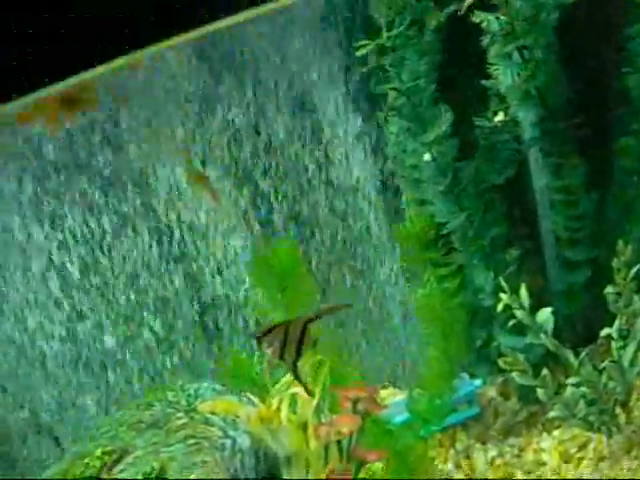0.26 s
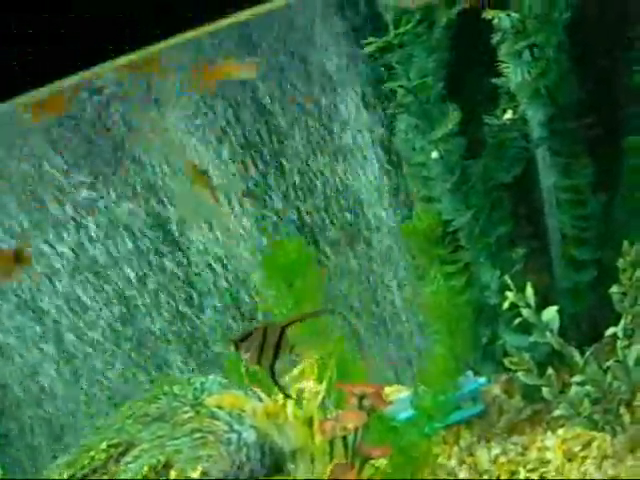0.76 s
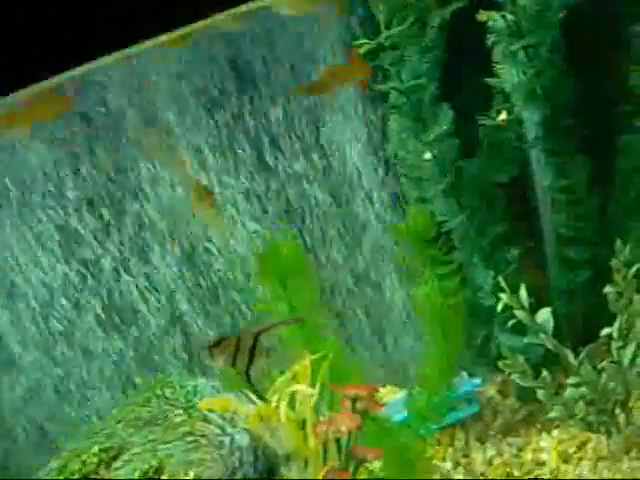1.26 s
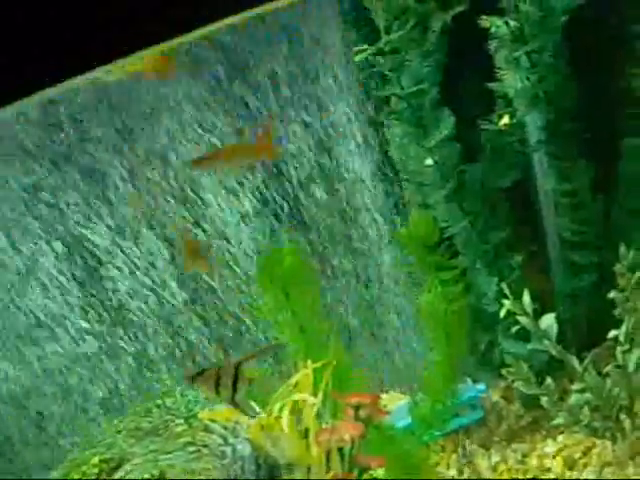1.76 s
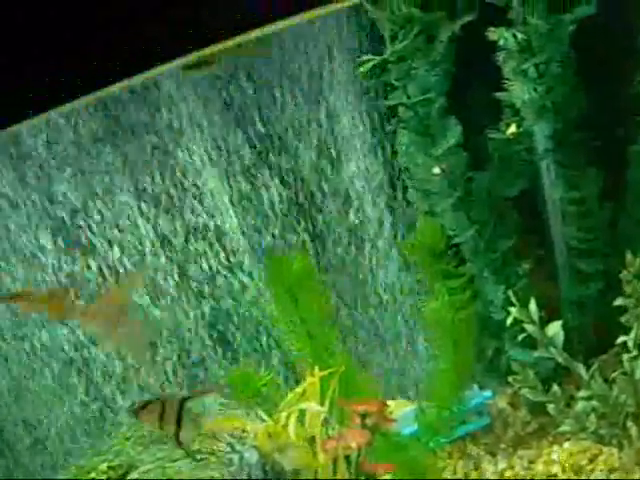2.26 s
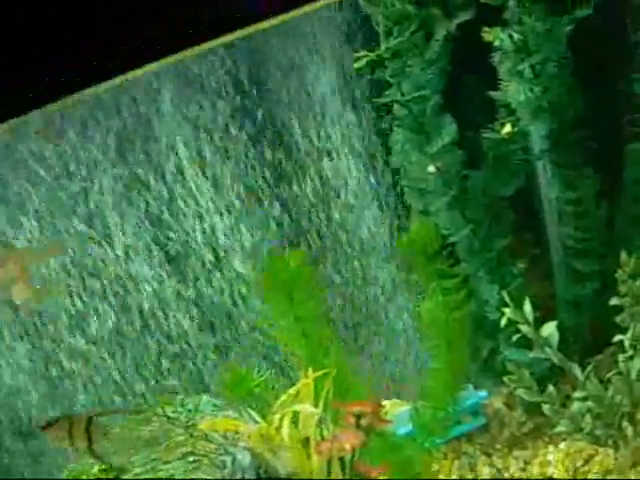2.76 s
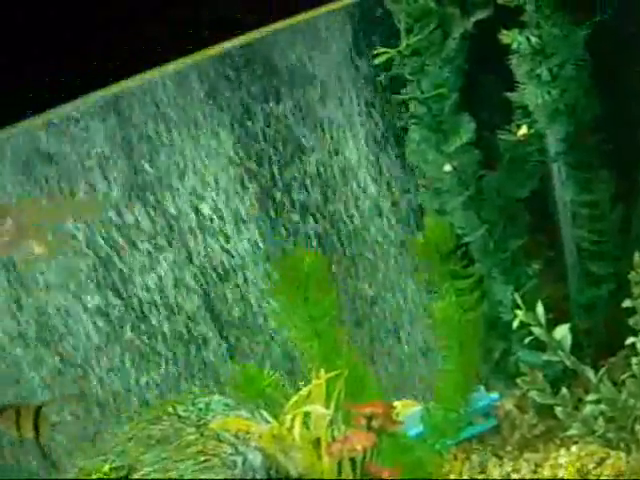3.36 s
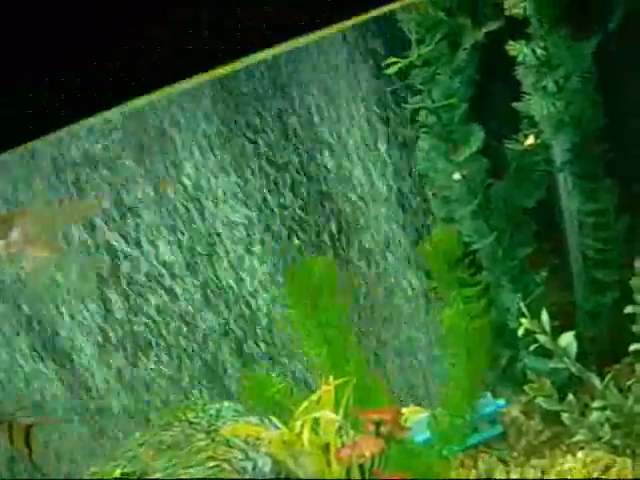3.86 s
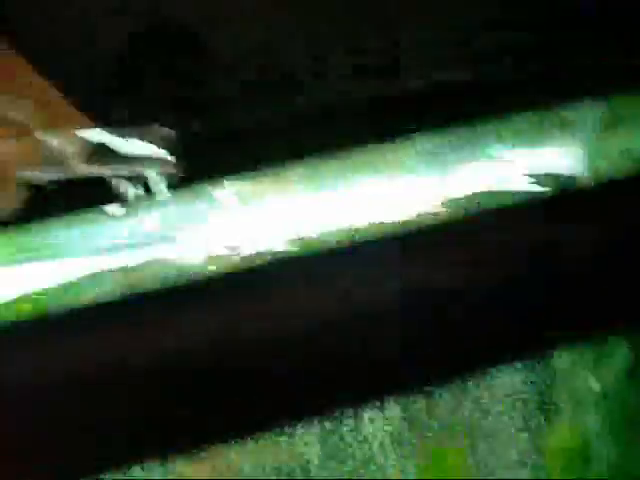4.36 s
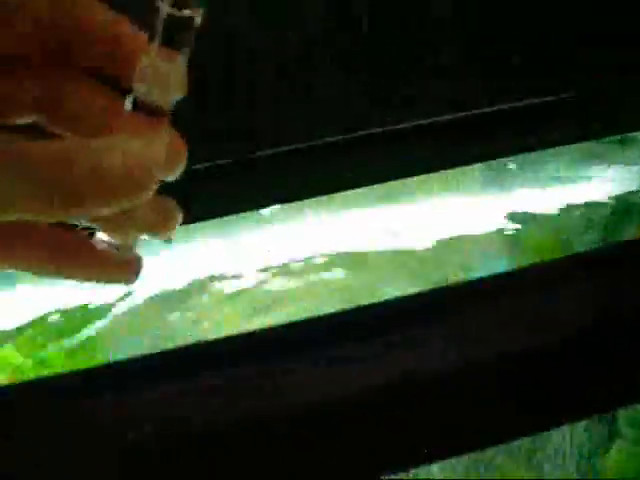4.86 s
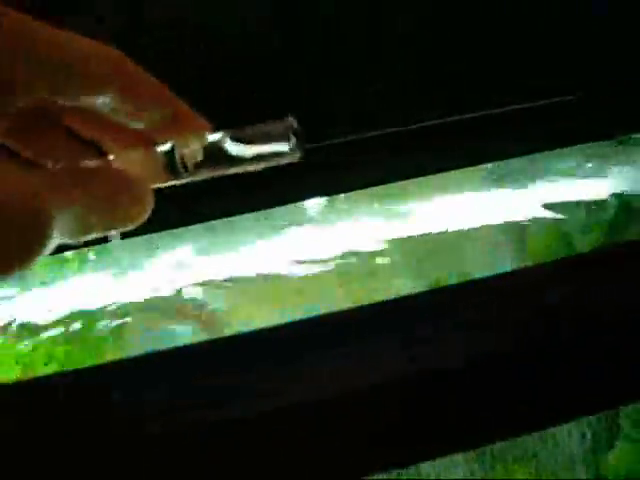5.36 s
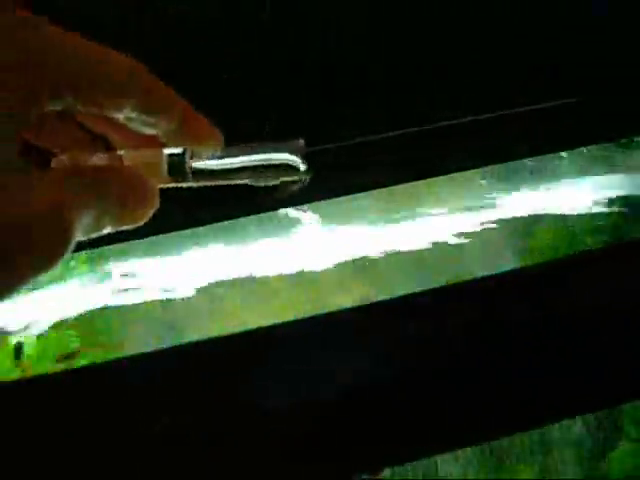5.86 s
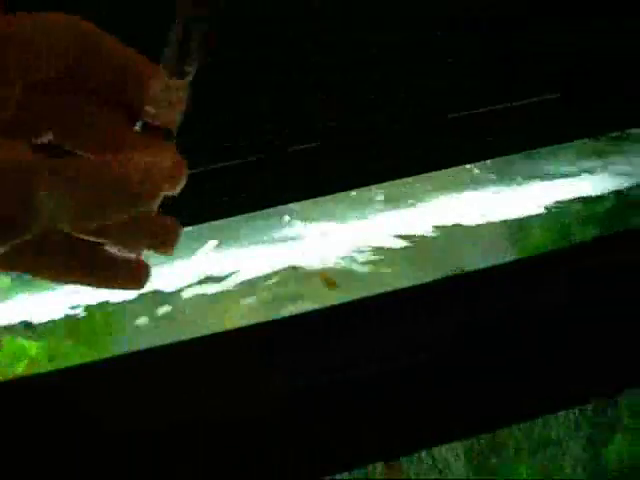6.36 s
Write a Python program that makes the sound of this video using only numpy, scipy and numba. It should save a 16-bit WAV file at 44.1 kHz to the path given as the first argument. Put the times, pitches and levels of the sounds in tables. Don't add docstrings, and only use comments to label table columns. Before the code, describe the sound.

An aquarium pump buzzes low under a muffled bubbling, then a thud opens it into bright fizzing, with sharp glass clicks and small water drips.

```python
import sys
import numpy as np
from scipy import signal
from scipy.fft import rfft, irfft
from scipy.io import wavfile
from scipy.ndimage import uniform_filter1d
from numba import njit

SR = 44100
rng = np.random.default_rng(int(sys.argv[2]) if len(sys.argv) > 2 else 0)


def field_ratio(decibels):
    return 10 ** (np.asarray(decibels, dtype=float) / 20)


def put_to_file(sound):
    columns = np.atleast_2d(sound).T
    safe = np.clip(columns, -1, 1)
    whole_steps = np.round(safe * 32767)
    wavfile.write(sys.argv[1], SR, whole_steps.astype(np.int16))


N = 291942

STROKE_PAIR_HZ = 30.0515
HOLD_HZ = 8012.728

# time_s, opening (0 shut to 1 open)
LID_OPENING = [
    (3.765, 0),
    (3.79, .25),
    (3.812, 1),
]
# time_s, gain_db
NEARNESS = [
    (0, -2),
    (.8, -1.5),
    (1.2, 1),
    (3.7, 1.5),
    (3.9, -2.5),
    (4.3, 1.5),
    (6.62, -0.6),
]


@njit
def ring(start, hz, cycles, glide, size, rise):
    out = np.zeros(N)
    for k in range(len(start)):
        n = int(cycles[k] * SR / hz[k])
        turn = np.exp(2j * np.pi * hz[k] / SR - np.log(1000) / n)
        bend = np.exp(2j * np.pi * hz[k] * glide / SR / n)
        z = size[k] + 0j
        for i in range(start[k], min(start[k] + n, N)):
            out[i] += z.imag * min((i - start[k]) * hz[k] / SR / rise, 1.)
            z *= turn
            turn *= bend
    return out


def strikes(start_s, level_db, pitch_hz, cycles, glide, rise=0.19, sign=1):
    start = (start_s * SR).astype(np.int64)
    size = sign * field_ratio(level_db)
    return ring(start, 1. * pitch_hz, 1. * cycles, float(glide), size, max(float(rise), .01))


def curve(table):
    return np.interp(np.arange(N) / SR, *np.transpose(table))


def unit(x):
    return x / np.sqrt(np.mean(x ** 2))


def colour(x, points):
    hz, db = np.transpose(points)
    f = np.maximum(np.fft.rfftfreq(N, 1 / SR), 1)
    gain = field_ratio(np.interp(np.log(f), np.log(hz), db))
    band = (f > hz[0] / 2) * (f < max(hz[-1], HOLD_HZ / 2))
    return unit(irfft(rfft(x) * gain * band, N))


def walk(rate):
    k = int(SR / rate)
    held = np.repeat(rng.standard_normal(N // k + 1), k)
    return 1.04 * uniform_filter1d(uniform_filter1d(held, k), k)[:N]


def tremor():
    # time_s, level_db
    grip = [
        (0, -42.5),
        (.85, -43.5),
        (1.1, -49),
        (3.66, -48.5),
        (3.78, -32),
        (3.9, -55),
        (6.62, -57),
    ]
    twitch_db, twitches_per_s = 3, 10
    shake = colour(rng.standard_normal(N), [(14, 8), (35, 3), (55, -7), (100, -25), (170, -18), (260, -43)])
    return shake * field_ratio(curve(grip) + twitch_db * walk(twitches_per_s))


def knocks():
    # start_s, level_db (peak), pitch_hz, t60_s, direction (push +1, pull -1)
    thuds = [
        (.95, -32, 350, .012, -1),
        (1.3075, -28, 210, .03, 1),
        (1.312, -33, 680, .03, 1),
        (3.703, -26, 55, .1, -1),
        (3.732, -28, 110, .026, 1),
        (3.755, -31, 250, .016, -1),
        (3.76, -25, 24, .1, 1),
        (3.777, -21, 13, .16, -1),
        (3.797, -28, 110, .03, 1),
    ]
    start_s, level_db, pitch_hz, t60_s, direction = np.transpose(thuds)
    return strikes(start_s, level_db, pitch_hz, t60_s * pitch_hz, 0, rise=0.14, sign=direction)


def creaks():
    # start_s, length_s, level_db, lowest_hz, highest_hz
    bursts = [
        (.95, .01, -39, 400, 3500),
        (1.312, .026, -41, 300, 850),
        (3.78, .02, -35, 650, 1800),
    ]
    out = np.zeros(N)
    for start_s, length_s, level_db, low_hz, high_hz in bursts:
        when, pitch = rng.random((14, 2)).T
        slip_hz = low_hz * (high_hz / low_hz) ** pitch
        out += strikes(start_s + length_s * when, np.full(14, level_db + 7), slip_hz, np.full(14, 4.5), 0)
    return out


def drops():
    # start_s, level_db (peak), pitch_hz, cycles
    falls = [
        (4.73, -29, 1350, 20),
        (4.9, -23, 3100, 20),
        (4.956, -29, 3050, 20),
        (5.04, -21, 1290, 26),
        (5.78, -19, 1300, 8.9),
    ]
    return strikes(*np.transpose(falls), .1)


def tube():
    # start_s, level_db (peak), pitch_hz, t60_s, direction (push +1, pull -1)
    ticks = [(4.3706, -9.5, 2915, .021, 1), (4.3706, -13.5, 3320, .021, -1), (4.3708, -15.5, 3600, .016, 1),
             (4.3737, -17, 3100, .008, 1), (5.7624, -5, 3450, .0045, -1), (5.7624, -10, 1900, .011, -1),
             (5.7649, -15, 2094, .015, 1), (5.7632, -18, 2700, .009, 1), (4.1805, -21.5, 1800, .02, 1),
             (4.1795, -22, 3000, .004, 1), (5.9515, -18.5, 3900, .015, 1), (4.2935, -23, 2000, .004, -1),
             (5.772, -24, 3800, .006, 1), (5.7745, -22, 2200, .012, 1), (5.7958, -21.5, 3700, .012, 1)]
    start_s, level_db, pitch_hz, t60_s, direction = np.transpose(ticks)
    return strikes(start_s, level_db, pitch_hz, t60_s * pitch_hz, 0, rise=1.7, sign=direction)


def pump(lid, wobble_db=.6):
    # multiple (of a stroke pair), shut_db, open_db
    harmonics = [(1, -58, -58.5), (2, -44.5, -45.5), (3, -56, -58), (4, -55, -59.5), (6, -71, -62.5),
                 (7, -65, -64), (8, -56.5, -52), (9, -66, -66), (10, -63, -58.5), (12, -62, -54.5),
                 (13, -72, -79), (14, -63, -63), (16, -65, -60), (18, -67, -57.5), (20, -62, -54),
                 (22, -59, -56), (24, -70, -59), (26, -77, -64), (28, -63.5, -51), (30, -70, -55),
                 (32, -66.5, -58), (34, -69, -63), (36, -83, -62)]
    phase = 2 * np.pi * STROKE_PAIR_HZ * (np.arange(N) / SR - .002)
    out, near_db = 0, curve(NEARNESS)
    for multiple, shut_db, open_db in harmonics:
        k = round(multiple)
        level_db = shut_db + lid * (open_db - shut_db) + wobble_db * walk(6)
        level_db = level_db + near_db * min(k / 20, 1)
        lag = 2 * np.pi * (rng.random() - .5) * min(k / 16, 1) ** 2
        out = out - np.sqrt(2) * field_ratio(level_db) * np.cos(k * phase + lag)
    return out


def bubbles(count=40000, cycles=14, scatter_db=1.47, hiss_db=-3, throb=0.036, patchy_db=0.78):
    when, size, loud = rng.random((count, 3)).T
    pitch_hz = 250 * 16 ** size
    level_db = 10 * np.log10(pitch_hz / 1000) - scatter_db * np.log(1.002 - loud)
    rings = unit(strikes(when * N / SR, level_db, pitch_hz, np.full(count, cycles), 0.26))
    hiss = field_ratio(hiss_db) * 3.03 * rng.standard_normal(N)
    stroke = 1 + throb * np.cos(4 * np.pi * STROKE_PAIR_HZ * np.arange(N) / SR)
    return (rings + hiss) * stroke * field_ratio(patchy_db * walk(9.8))


def fizz(lid):
    # pitch_hz, level_db
    shut_colour = [(60, -4), (120, -9), (220, -15), (500, -20), (800, -14.5), (1000, -19), (1250, -7.5),
                   (1400, -6.5), (1455, -0.5), (1510, -5), (1750, -7), (2100, -16.5), (3000, -16.5),
                   (4000, -20.5)]
    # pitch_hz, level_db
    open_colour = [(60, -22), (120, -18.5), (220, -16), (450, -19.5), (700, -12.5), (850, -5), (1050, -5.5),
                   (1170, -10), (1350, -1.5), (1550, -6.5), (2400, -6.5), (3300, -3), (4000, -3.5)]
    shut_db, open_db = -43, -34.5
    surge_db, surge_s = 2.3, 0.098
    near_share = 0.41
    stream = bubbles()
    since_s = np.maximum(np.arange(N) / SR - LID_OPENING[-1][0], 0)
    shut = colour(stream, shut_colour) * field_ratio(shut_db + near_share * curve(NEARNESS))
    opened = colour(stream, open_colour) * field_ratio(open_db + surge_db * np.exp(-since_s / surge_s))
    return shut * np.sqrt(1 - lid) + opened * lid


def scene():
    lid = np.clip(curve(LID_OPENING), 0, 1)
    handling = tremor() + knocks() + creaks()
    return (handling + drops() + tube() + pump(lid) + fizz(lid))[None]


def low_pass(x):
    return signal.sosfilt(signal.butter(12, 16390, fs=SR, output="sos"), x)


def record(dry):
    taken = np.floor(np.arange(N) * HOLD_HZ / SR) * SR / HOLD_HZ
    held = np.interp(taken, np.arange(N), dry[0])
    return low_pass(held[None])


dry = scene()
out = record(dry)
put_to_file(out)
```